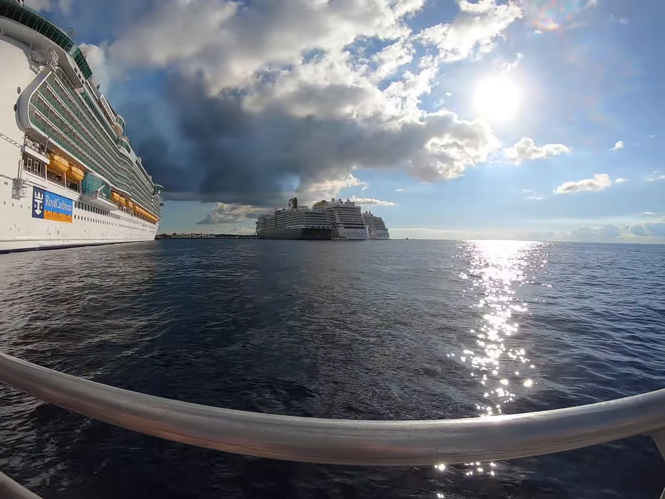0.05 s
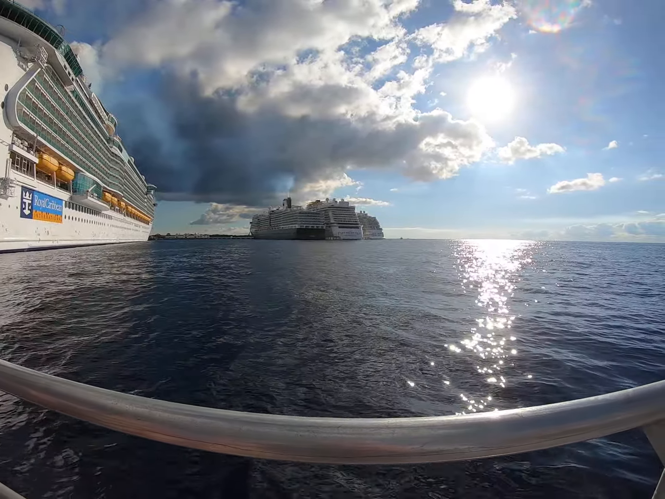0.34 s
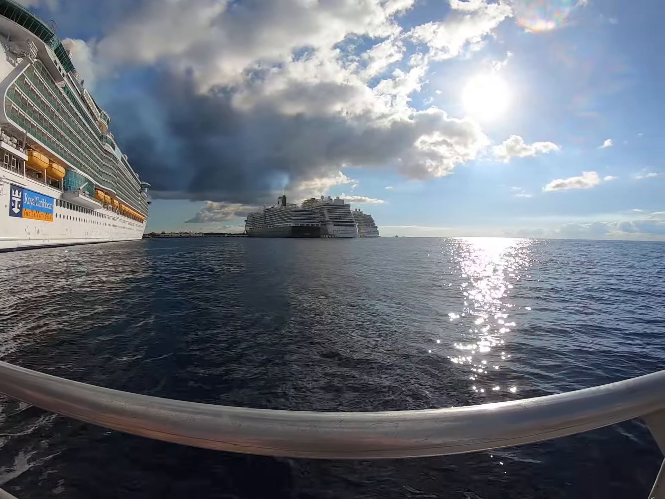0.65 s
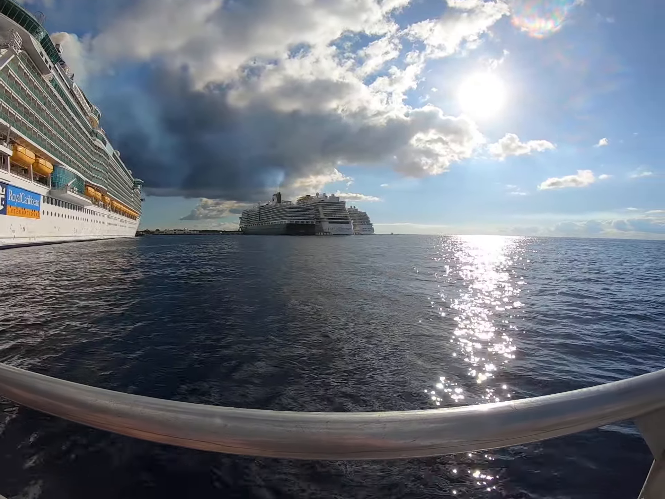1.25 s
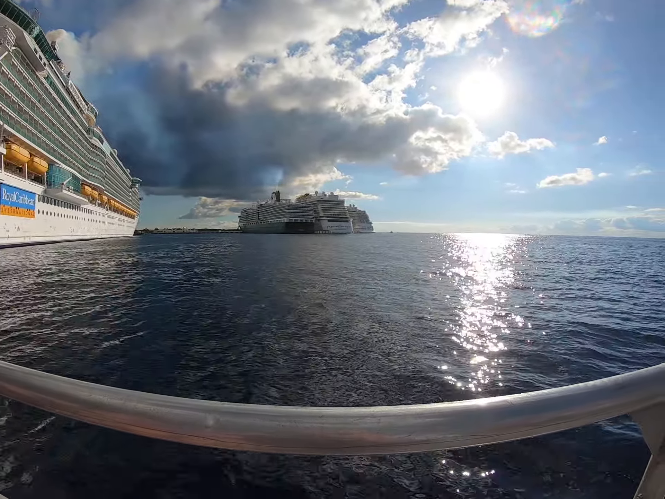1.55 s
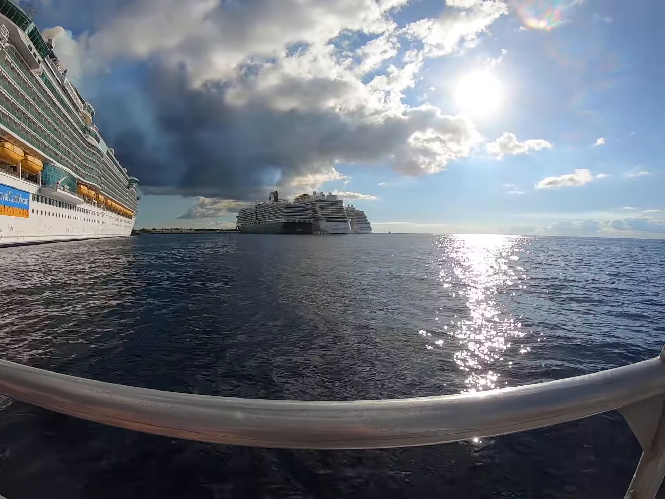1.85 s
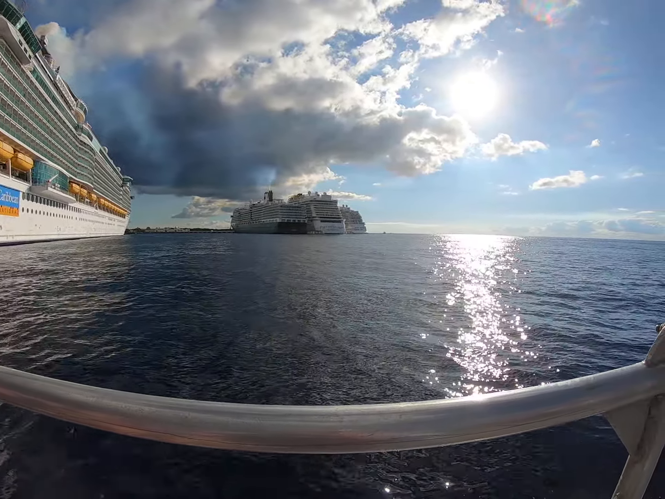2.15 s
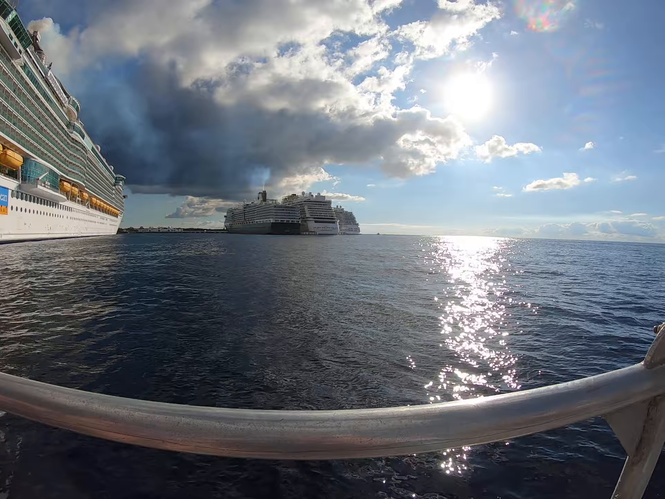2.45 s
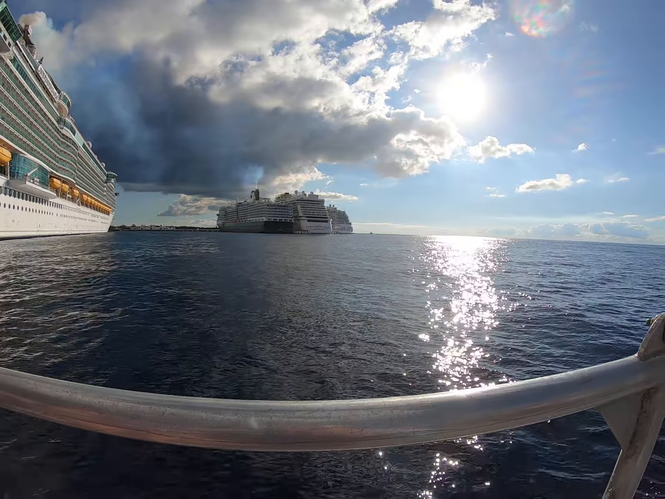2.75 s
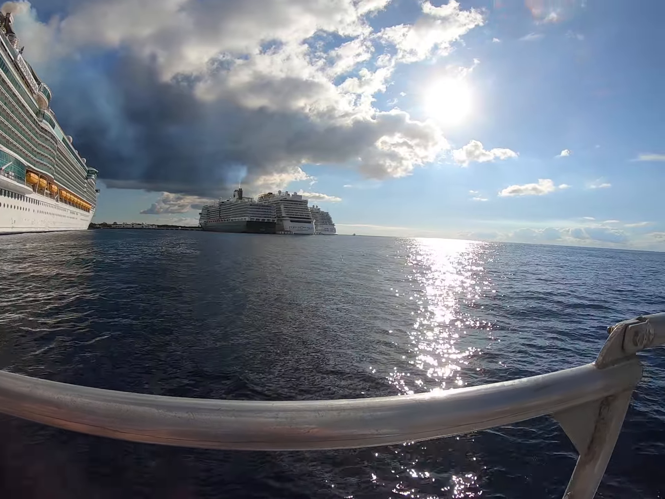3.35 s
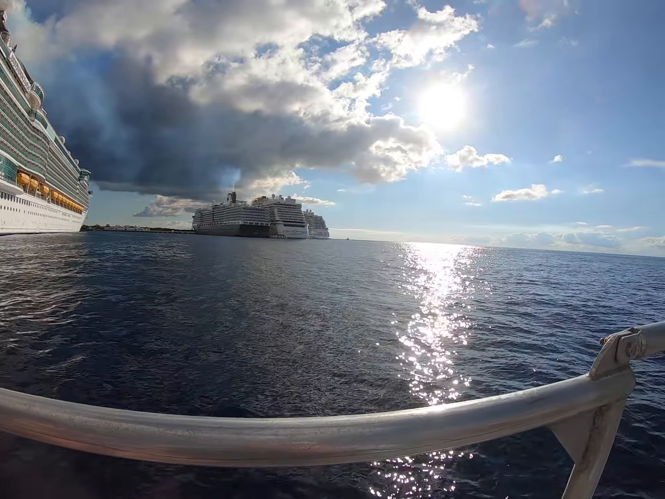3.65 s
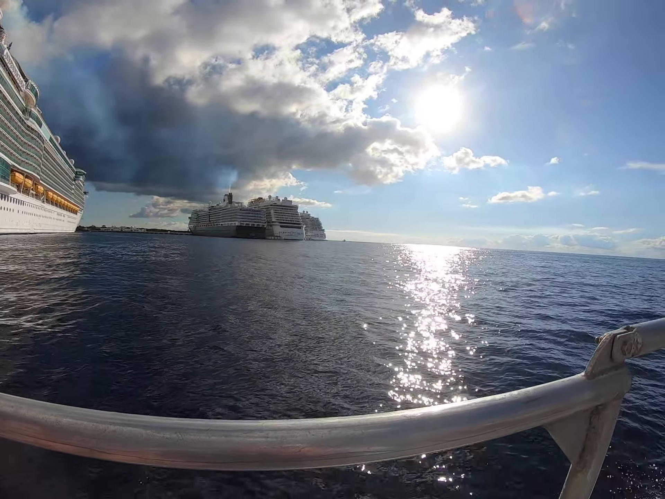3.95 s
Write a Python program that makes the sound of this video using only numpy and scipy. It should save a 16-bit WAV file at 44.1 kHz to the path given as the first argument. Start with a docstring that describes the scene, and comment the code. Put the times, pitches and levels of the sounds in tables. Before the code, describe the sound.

A small motor boat's engines throb low and fast throughout, with a droning hull, streaming water and wind rumbling on the microphone. The bow meets low swells: spray hisses up at about 0.5, 1.8, 2.8 and 4 seconds. Water falls back in a deep, bubbling wash near 0.9, 2 and 3.2 seconds, with soft sloshes under the hull. It is heard from the rail, with slightly dulled treble.

```python
"""Two engines of a small motor boat, at slightly different speeds, throb against each other.
Under them: a lighter machine's hum, a droning hull, wind rumble and streaming water.
About once a second the bow meets a low swell: spray hisses up, then falls back in a bubbling wash.
Heard from the rail through a waterproof camera housing that dulls and notches the treble."""
import sys
import numpy as np
from scipy import signal
from scipy.fft import rfft, irfft
from scipy.io import wavfile

SR = 44100
rng = np.random.default_rng(int(sys.argv[2]) if len(sys.argv) > 2 else 0)


def generate_wav(sig):
    """Save sig (samples, or channels by samples) to the path in sys.argv[1] as 16-bit PCM at SR."""
    pcm = np.round(np.clip(np.atleast_2d(sig).T, -1, 1) * 32767).astype(np.int16)
    wavfile.write(sys.argv[1], SR, pcm)


N = 176400

# Each row: firing rate in Hz, level in dB, second harmonic in dB against the first.
ENGINE_TONES = [(96.95, -23.5, -18), (106.23, -23.3, -22)]
# Exhaust as the hull rises and sinks. Each row: time in seconds, gain in dB.
EXHAUST_GAIN = [(0, 1), (.08, 3), (.25, -3), (.7, -2), (.95, 2.5), (1.2, 1), (1.45, -4), (2.05, 2.5),
                (2.35, 2), (2.8, .5), (3.25, -3), (3.6, 1.5), (4, 1)]
# Each row: multiple of the turning rate, level in dB.
MACHINE_HARMONICS = [(4, -33), (5, -41), (6, -35), (10, -47)]
# Each row: centre in Hz, width in Hz, level in dB.
HULL_MODES = [(123, 4, -38), (138, 5, -36), (163, 8, -39), (195, 9, -34.5), (213, 7, -41)]
# Hull drone. Each row: time in seconds, gain in dB.
DRONE_GAIN = [(0, 1), (.35, -4), (.7, -1), (.98, 4), (1.4, -3), (2.1, -2), (2.5, 2), (2.95, 4), (3.3, -2),
              (4, -3)]
# Sloshes under the hull. Each row: peak time in seconds, half length in seconds, level in dB.
SLOSH_EVENTS = [(.05, .07, -31), (.84, .09, -32), (2.88, .15, -33), (3.38, .05, -34), (3.87, .09, -33.5)]
# Each row: start in seconds, spray rise in seconds, spray gain in dB, time the water falls back
# in seconds, wash gain in dB, time the bow lifts clear in seconds.
BOW_WAVES = [(-.74, .21, -3, -.07, -9, .17), (.36, .18, -.7, .91, 1.2, 1.42),
             (1.42, .35, 0, 1.99, 2.3, 2.47), (2.65, .18, 1.7, 3.17, 1.8, 3.52),
             (3.81, .18, -2.7, 4.24, -2.4, 4.7)]
# Noise spectra. Each row: frequency in Hz, relative density in dB.
WIND_SPECTRUM = [(3, -35), (10, -18), (18, -11), (30, -4.5), (50, -1.8), (75, 1), (110, -2), (150, -5),
                 (178, -10), (230, -15), (300, -26), (600, -45), (4000, -90)]
WAKE_SPECTRUM = [(90, -8), (200, 0), (350, -4.5), (550, -9.5), (1000, -16), (2000, -22.5), (3300, -31),
                 (6200, -33.5), (9500, -39), (15500, -41)]
SLOSH_SPECTRUM = [(100, -15), (200, -1), (400, -1), (650, -6), (1200, -20), (4000, -45), (15500, -70)]
WASH_SPECTRUM = [(80, -14), (200, -1.5), (350, -1.7), (550, -5.2), (1000, -11.5), (2000, -19),
                 (3000, -23.3), (4200, -25), (6200, -29.5), (9500, -34), (15500, -38)]
SPRAY_SPECTRUM = [(100, -22), (200, -12.5), (350, -6), (550, -2.3), (1000, -.3), (2000, -7.8),
                  (3000, -10.3), (4200, -9.9), (6200, -12.6), (9500, -17.1), (15500, -20.3)]
# Each row: frequency in Hz, gain in dB.
HOUSING_RESPONSE = [(20, 0), (4200, 0), (4430, -10), (4600, -8.5), (4900, -16.8), (5300, -11), (6200, -7),
                    (9500, -10), (10600, -8), (11400, -19), (12300, -16), (13400, -18), (15600, -30)]


def undb(db):
    """Decibels to gain."""
    return np.exp(np.asarray(db) * np.log(10) / 20)


def unit(x):
    """Scale to rms 1."""
    return x / np.sqrt(np.mean(x ** 2))


def times_s():
    """Time of every sample."""
    return np.arange(N) / SR


def bins_hz():
    """Frequency of every spectral bin."""
    return np.maximum(np.arange(N // 2 + 1) * SR / N, 1)


def response(points):
    """Gain per bin from (Hz, dB) points joined on a log axis."""
    hz, db = np.array(sorted(points)).T
    return undb(np.interp(np.log(bins_hz()), np.log(hz), db))


def walk(rate_hz):
    """Smooth random motion with spread 1."""
    step = 100
    size = N // step + 1
    rolloff = 1 + (np.arange(size // 2 + 1) * SR / N / rate_hz) ** 4
    slow = irfft(rfft(rng.standard_normal(size)) / rolloff, size)
    return np.interp(np.arange(N), np.arange(size) * step, unit(slow))


def churn(spectrum, flicker_db, rate_hz, bands=9):
    """Coloured noise whose overlapping bands flicker independently."""
    band_index = np.interp(np.log(bins_hz()), np.log([40, 12000]), [0, bands - 1])
    noise = response(spectrum) * rfft(rng.standard_normal(N))
    out = 0
    for k in range(bands):
        band = irfft(noise * np.maximum(1 - abs(band_index - k), 0), N)
        out += band * undb(flicker_db * walk(rate_hz))
    return unit(out)


def wandering_cycles(hz, wander=.0003):
    """Running cycle count at a slightly unsteady speed."""
    return hz * np.cumsum(1 + wander * walk(rate_hz=2)) / SR


def engines(in_step_s=2.006, rough_db=.8, trim_db=.1):
    """Two muffled exhausts drift in and out of step, about nine throbs a second."""
    t, out = times_s(), 0
    for hz, db, second_db in ENGINE_TONES:
        firings = wandering_cycles(hz)
        angle = 2 * np.pi * (firings - np.interp(in_step_s, t, firings))
        tone = np.sin(angle) + undb(second_db) * np.sin(2 * angle + 2 * np.pi * rng.random())
        out += np.sqrt(2) * tone * undb(db + rough_db * walk(rate_hz=16))
    return out * undb(trim_db + np.interp(t, *np.array(EXHAUST_GAIN).T))


def machine(turning_hz=32.88, waver_db=2.5):
    """A lighter machine hums on wavering multiples of its turning rate."""
    turns, out = wandering_cycles(turning_hz), 0
    for multiple, db in MACHINE_HARMONICS:
        tone = np.sin(2 * np.pi * (multiple * turns + rng.random()))
        out += undb(db) * unit(tone * undb(waver_db * walk(rate_hz=2)))
    return out


def hull():
    """Shaken by engines and water, the hull drones in narrow resonances, swelling and sinking."""
    modes = 0
    for hz, width_hz, db in HULL_MODES:
        modes += undb(db) * unit(1 / (1 + (2 * (bins_hz() - hz) / width_hz) ** 2))
    drone = irfft(rfft(rng.standard_normal(N)) * modes, N)
    return drone * undb(np.interp(times_s(), *np.array(DRONE_GAIN).T))


def wind(level_db=-23.6):
    """The headwind buffets the housing."""
    return undb(level_db) * churn(WIND_SPECTRUM, flicker_db=2.3, rate_hz=6)


def wake(stream_db=-34.5):
    """Water streams along the hull and now and then sloshes under it."""
    t = times_s()
    stream = churn(WAKE_SPECTRUM, flicker_db=1.6, rate_hz=11)
    slosh = churn(SLOSH_SPECTRUM, flicker_db=1.6, rate_hz=20, bands=4)
    swells = sum(undb(db) * np.exp(-((t - at_s) / half_s) ** 2) for at_s, half_s, db in SLOSH_EVENTS)
    return undb(stream_db) * stream + swells * slosh


def pings(per_s, low_hz, high_hz, cycles, spread_db, glide=.2):
    """Air pockets ring in water: short rising pings at random times and pitches."""
    out = np.zeros(N + SR)
    for when, pitch, strength in rng.random((8000, 3))[:int(per_s * N / SR)]:
        hz = low_hz * (high_hz / low_hz) ** pitch
        age = np.linspace(0, 1, int(cycles * SR / hz) + 2)
        angle = 2 * np.pi * cycles * age * (1 + glide * age / 2)
        ping = np.sin(angle) * undb(-40 * age)
        start = int(when * N)
        out[start:start + len(age)] += ping * undb(spread_db * strength) * np.sqrt(low_hz / hz)
    return unit(out[:N])


def wash(base_db=-29.4, rise_db_per_s=35, fade_db_per_s=15.5, bubble_mix_db=-10):
    """Water thrown by the bow falls back in a deep rush full of bubbles."""
    t, power = times_s(), 0
    for _, _, _, fall_s, db, _ in BOW_WAVES:
        below_peak_db = np.maximum(rise_db_per_s * (fall_s - t), fade_db_per_s * (t - fall_s))
        power += undb(db - below_peak_db) ** 2
    bubbles = pings(per_s=260, low_hz=300, high_hz=2200, cycles=18, spread_db=18)
    rush = churn(WASH_SPECTRUM, flicker_db=1.2, rate_hz=20)
    return undb(base_db) * np.sqrt(power) * (rush + undb(bubble_mix_db) * bubbles)


def spray(base_db=-34.4, fade_db_per_s=13.5, stop_db_per_s=45, drop_mix_db=-16, surge_db=.7):
    """The bow cuts each wave: a hiss of droplets swells, thins and stops as the bow lifts clear."""
    t, power = times_s(), 0
    for start_s, rise_s, db, _, _, clear_s in BOW_WAVES:
        swell = np.clip((t - start_s) / rise_s, 0, 1)
        fade_db = fade_db_per_s * np.maximum(t - start_s - rise_s, 0)
        stop_db = stop_db_per_s * np.maximum(t - clear_s, 0)
        power += (swell * undb(db - fade_db - stop_db)) ** 2
    drops = pings(per_s=1200, low_hz=2200, high_hz=11000, cycles=5, spread_db=22)
    hiss = churn(SPRAY_SPECTRUM, flicker_db=.7, rate_hz=22) + undb(drop_mix_db) * drops
    return undb(base_db + surge_db * walk(rate_hz=20)) * np.sqrt(power) * hiss


def scene():
    """Water, wind and machinery at the rail, mono."""
    return (spray() + wash() + wake() + wind() + engines() + machine() + hull())[None]


def record(dry):
    """The housing dulls and notches the treble; a steep low-pass cuts the top."""
    housed = irfft(rfft(dry) * response(HOUSING_RESPONSE), N)
    top_hz = 15650
    return signal.sosfilt(signal.ellip(8, .2, 70, top_hz, fs=SR, output="sos"), housed)


dry = scene()
out = record(dry)
generate_wav(out)
```